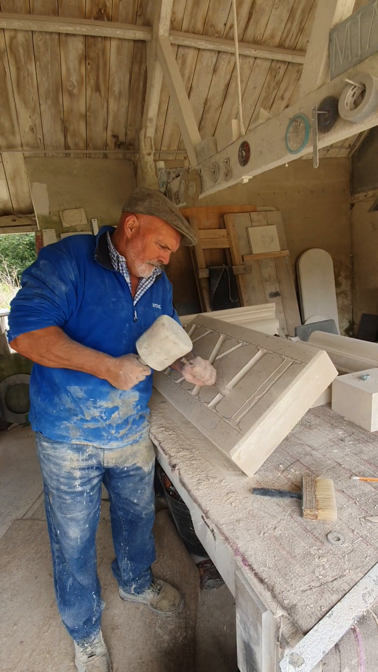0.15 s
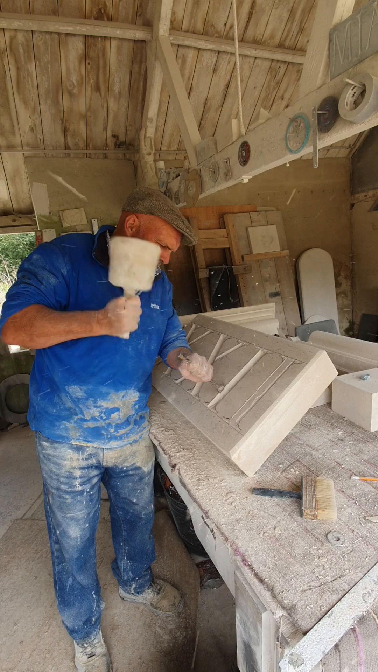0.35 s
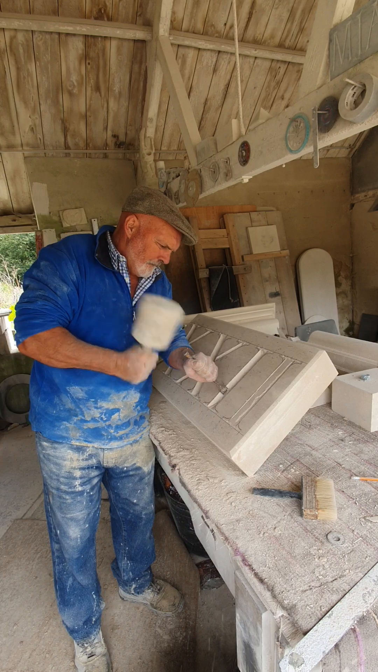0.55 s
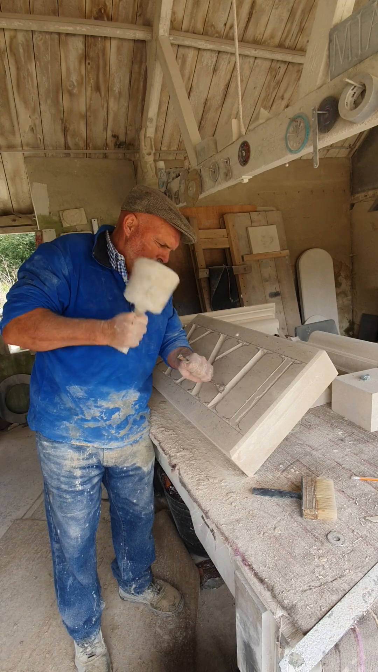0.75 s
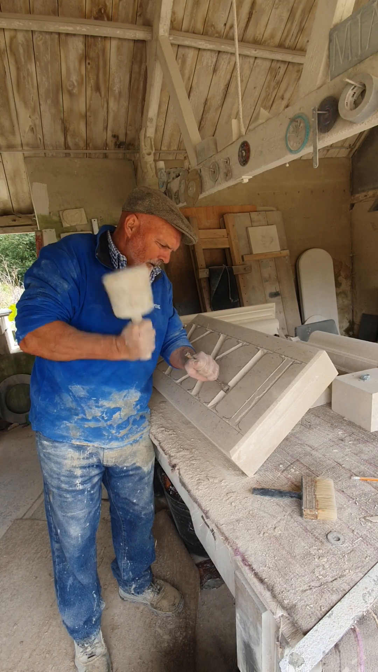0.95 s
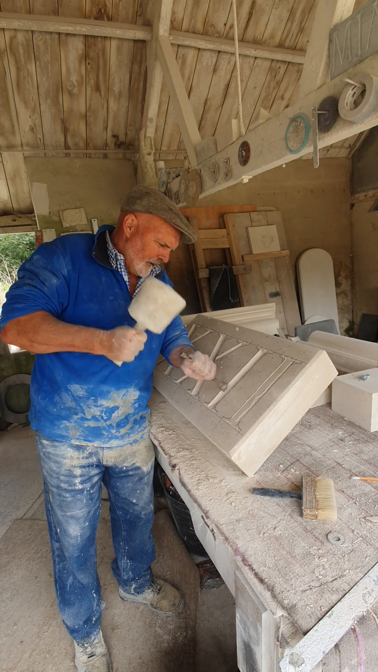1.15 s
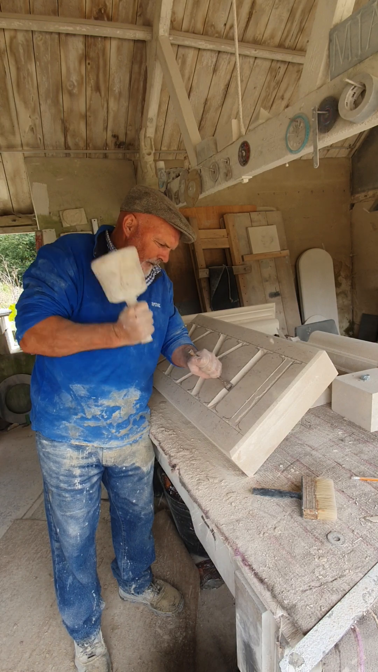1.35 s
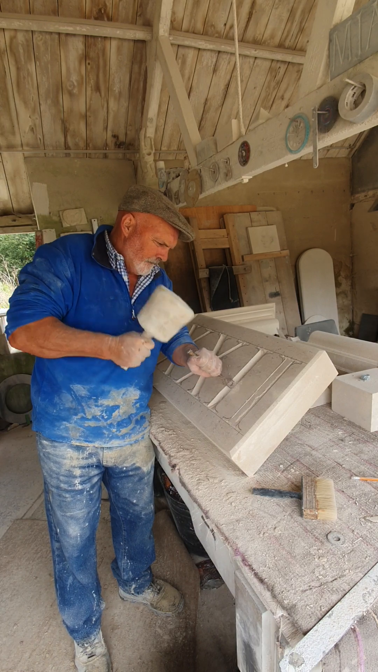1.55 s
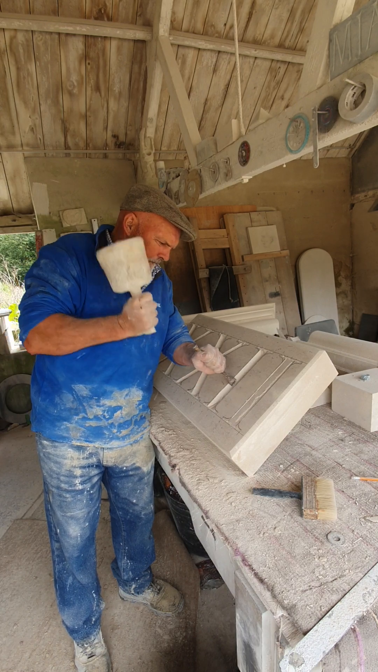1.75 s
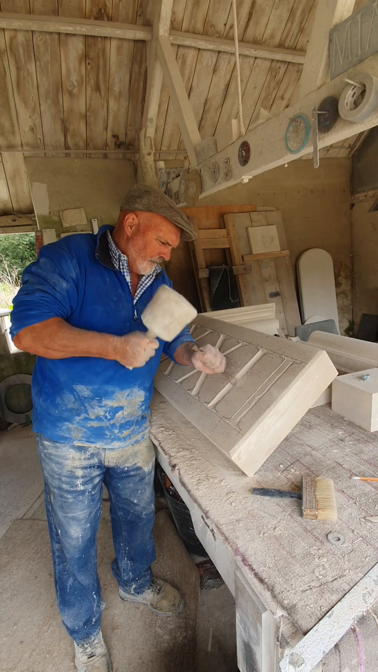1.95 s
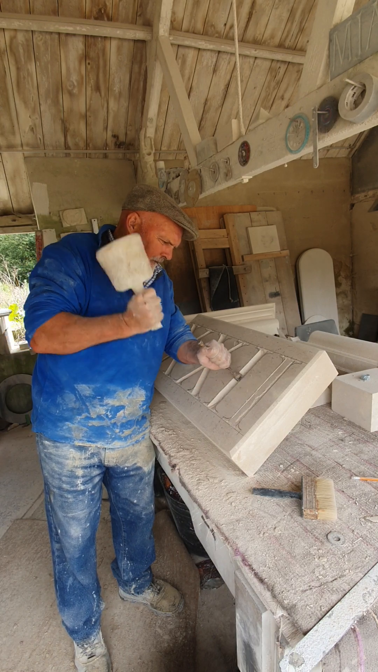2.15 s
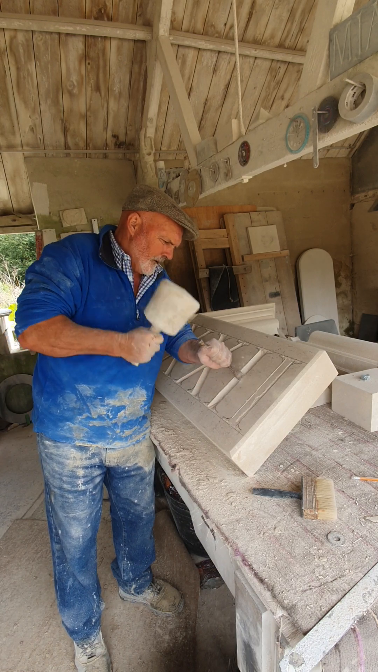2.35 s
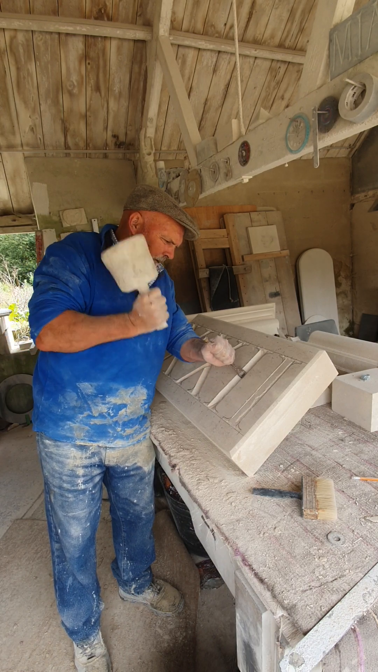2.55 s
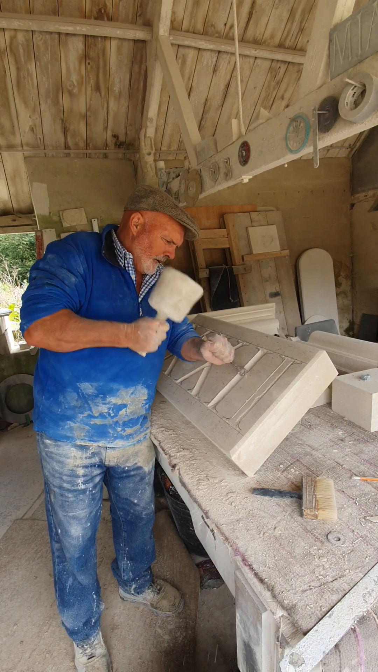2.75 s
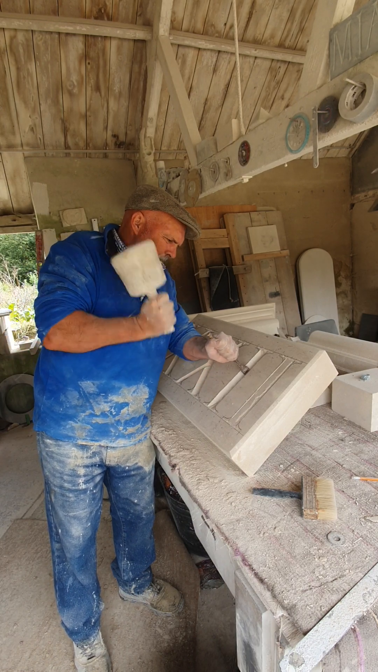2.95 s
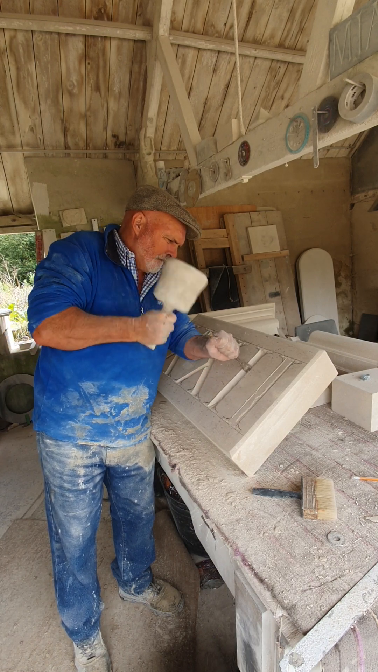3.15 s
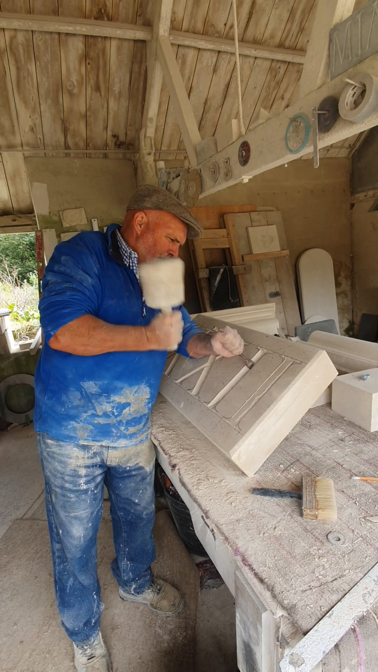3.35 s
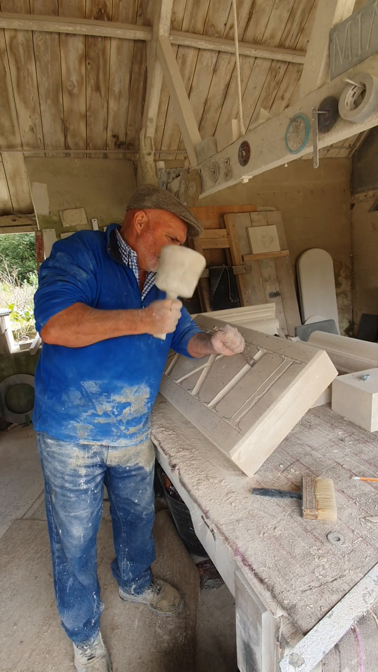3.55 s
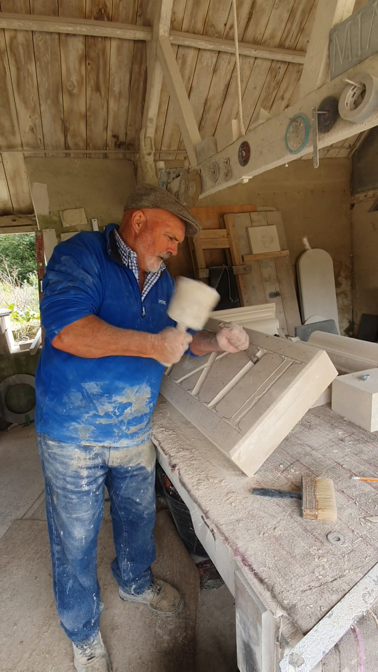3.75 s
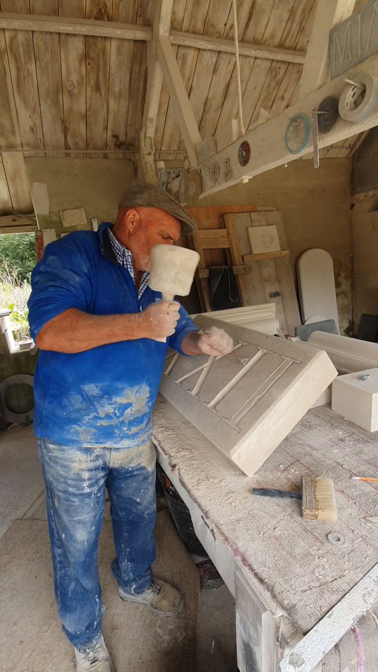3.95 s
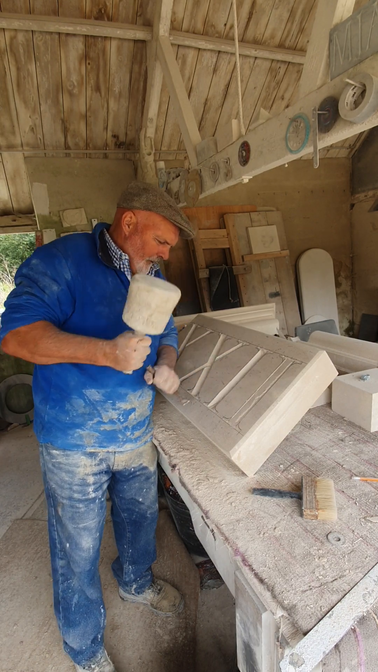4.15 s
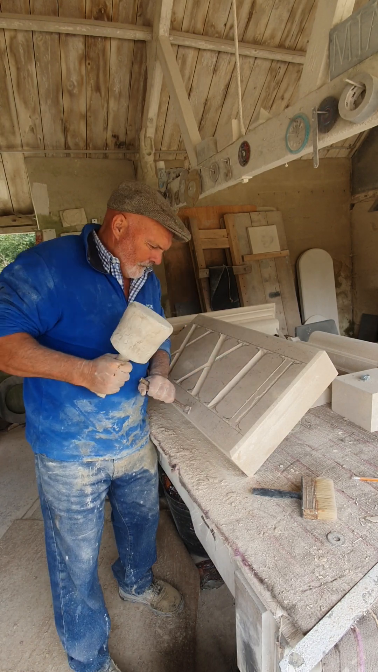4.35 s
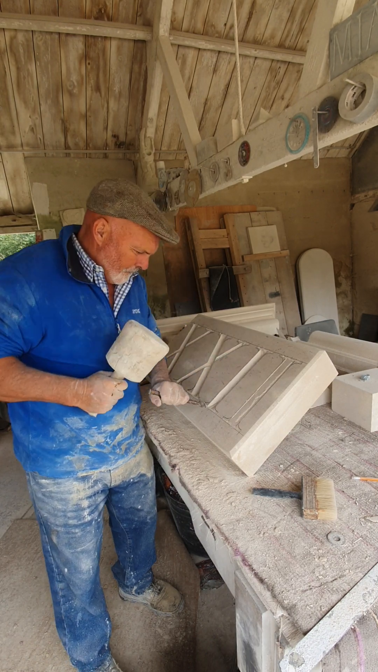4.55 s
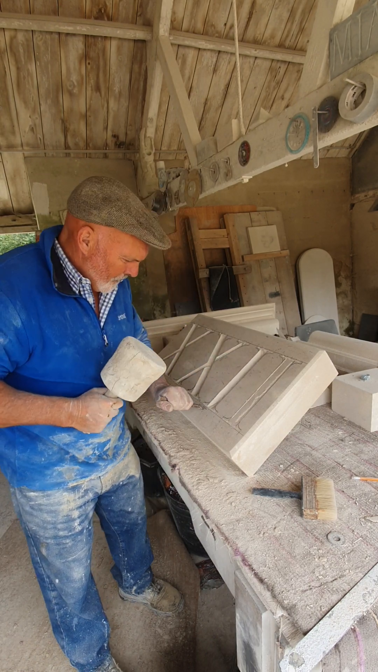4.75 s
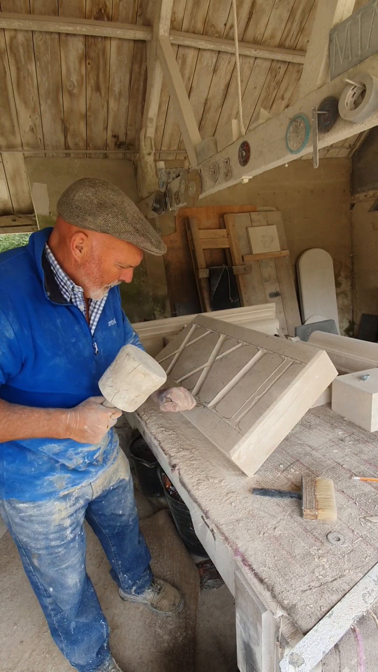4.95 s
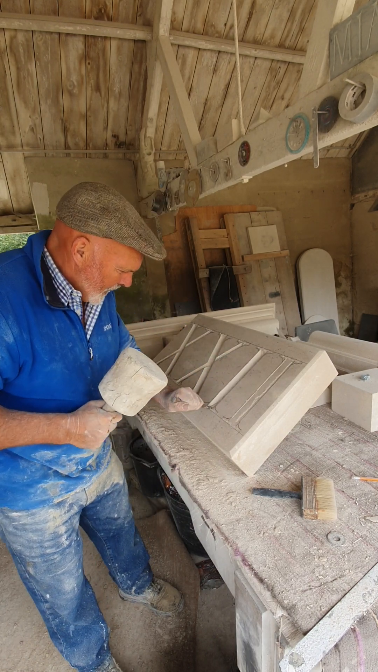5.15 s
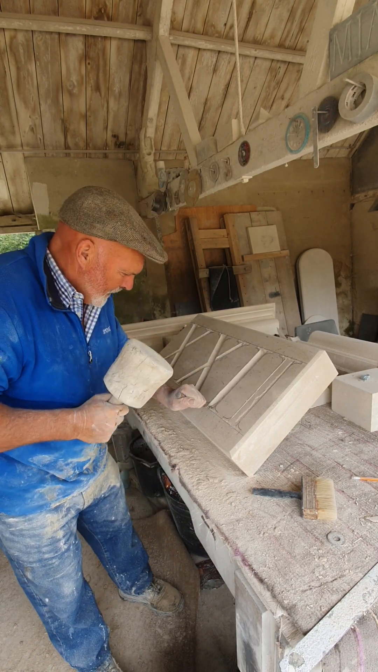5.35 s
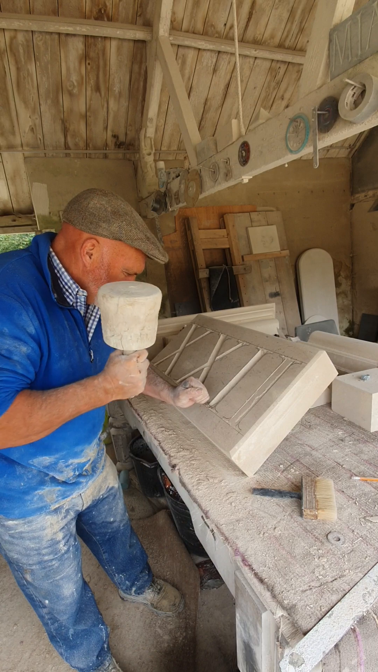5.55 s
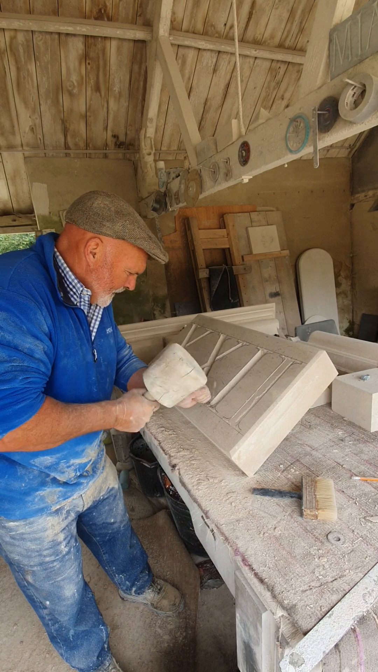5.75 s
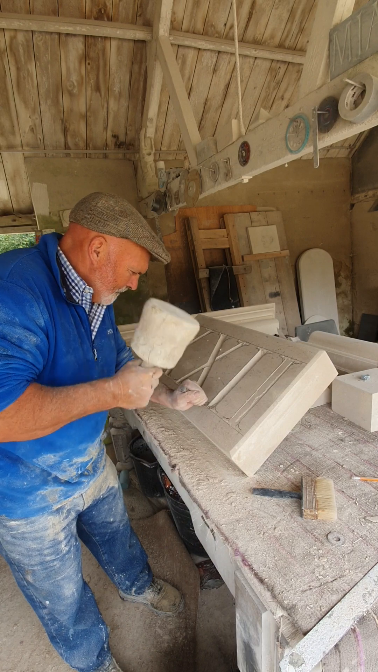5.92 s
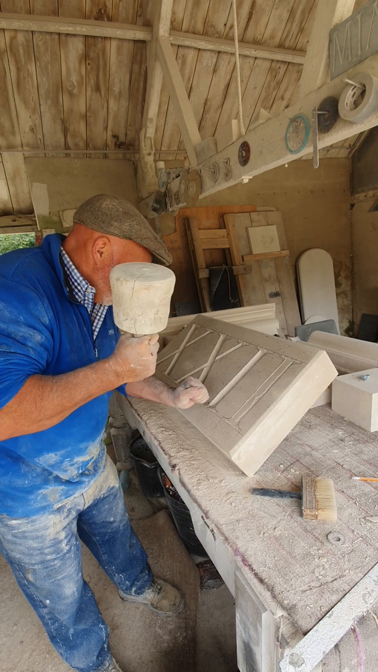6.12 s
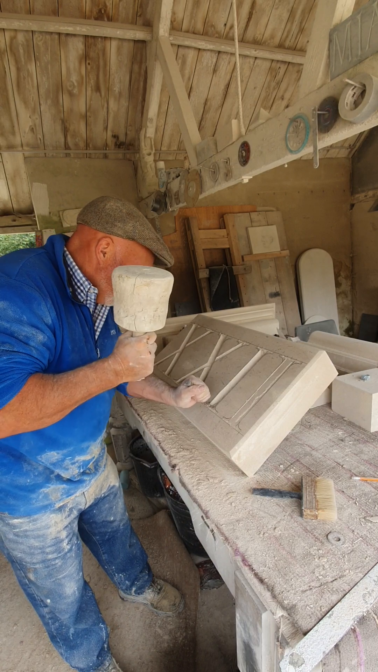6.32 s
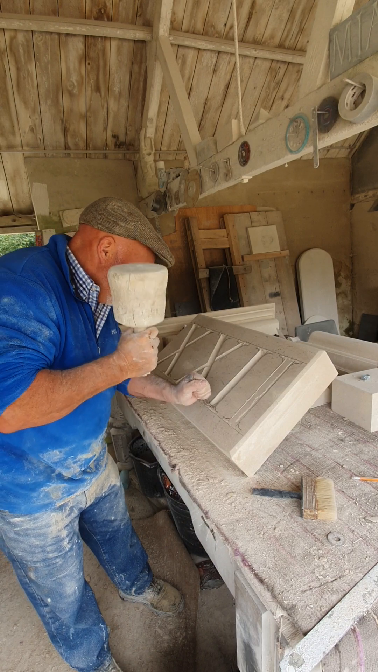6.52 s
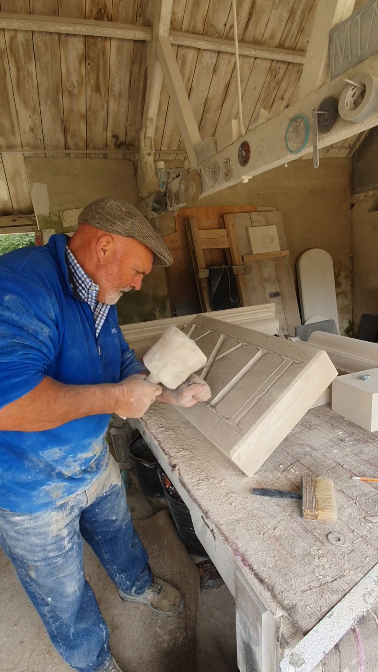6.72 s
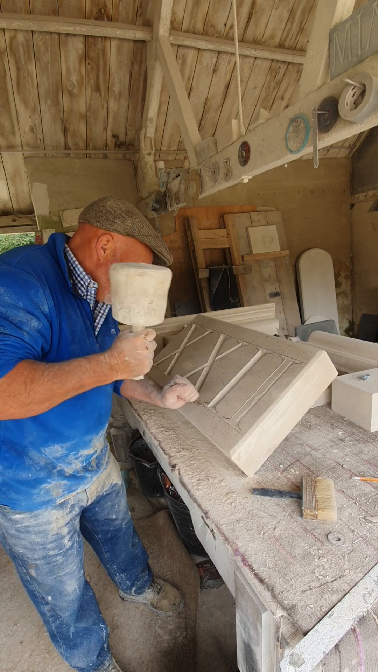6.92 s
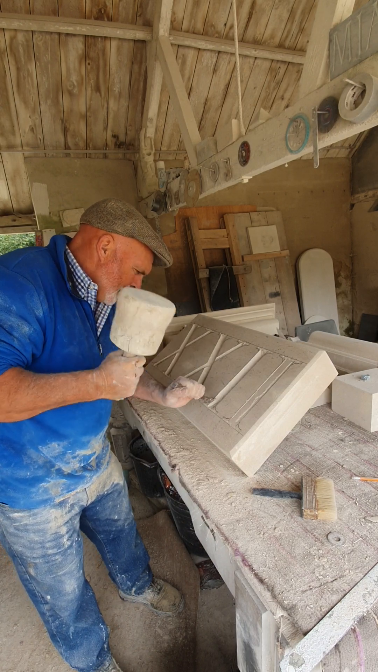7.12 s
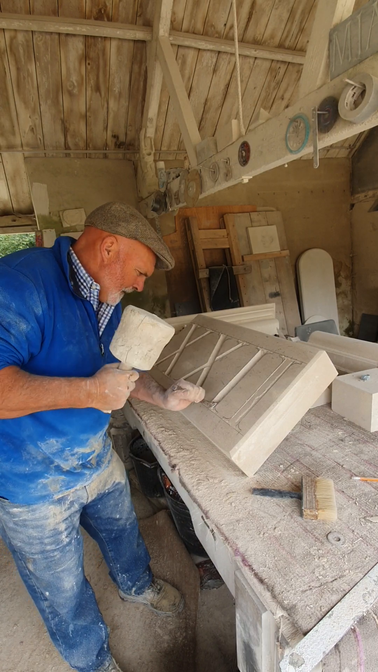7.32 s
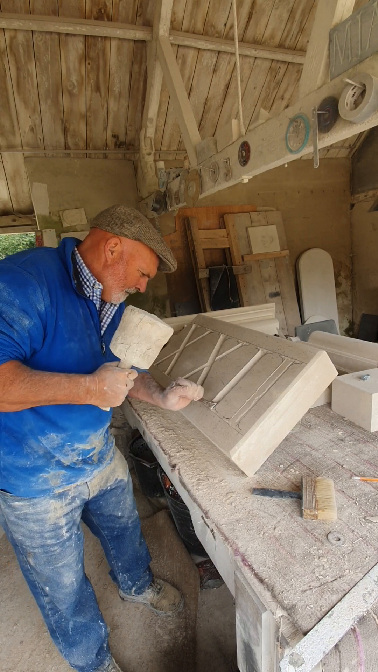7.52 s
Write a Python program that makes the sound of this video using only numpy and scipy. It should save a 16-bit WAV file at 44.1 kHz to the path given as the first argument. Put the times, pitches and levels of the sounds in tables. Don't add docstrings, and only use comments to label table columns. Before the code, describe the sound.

Steady stone carving heard from close by: eleven crisp, heavy chisel blows, slowly quickening, each booming through the bench and ringing briefly in slab and steel. Light clicks mark the edge being set back, and crumbs fall. Then the work stops, leaving low air buffeting, faint traffic and small birds, before one firm blow and, a second later, a weaker knock. Open wooden shed, stereo, little reverberation.

```python
import sys
import numpy as np
from scipy import signal
from scipy.fft import rfft, irfft
from scipy.io import wavfile
from scipy.ndimage import uniform_filter1d

SR = 44100
rng = np.random.default_rng(int(sys.argv[2]) if len(sys.argv) > 2 else 0)


def volts(x):
    e = np.asarray(x, float) / 20
    return 10 ** e


def digitize_waveform(pressure):
    field = np.atleast_2d(pressure).T
    bounded = np.clip(field, -1, 1)
    quanta = np.round(bounded * 32767).astype(np.int16)
    wavfile.write(sys.argv[1], SR, quanta)


N = 338688

# [t/s, bench level/dB, slab level/dB, shank level/dB]
BLOWS = [(-.215, -6.5, -6, -37), (0.2239, -9.5, -13, -38), (0.6734, -7.5, -10, -45.5),
         (1.1169, -8.5, -12, -37), (1.5537, -10.5, -23.5, -46), (1.9723, -10.5, -11, -39),
         (2.3688, -10, -17.5, -47), (2.754, -9, -17.5, -33), (3.136, -11, -15.5, -39.5),
         (3.5032, -12, -19.5, -37.5), (3.8658, -11.5, -13, -34.5), (5.82, -12, -18.5, -24),
         (6.764, -13.5, -14, -69.5)]
# [upper bench/dB, low slab/dB, upper slab pair/dB, slab edge/dB]
SEATS = [(-0.5, -2, 0.5, -2), (-3.5, -2.5, -1, -5), (-1, 0, -2, -3), (-1.5, -1, -2, 0), (-0.5, 2, 1, 3.5),
         (0, -0.5, -8, -0.5), (1, -0.5, -3.5, 2.5), (2, 2, -2.5, -1), (2.5, 1, -1.5, -1.5),
         (2, -1.5, 3, 3.5), (1.5, -2.5, 5, -3), (-2.5, 1, -2.5, 4.5), (-0.5, -3, -5, 0.5)]
# [t/s, crack/dB, knock/dB, splinter/dB, dust/dB]
BITES = [(-.22, 1.5, -4, -0.5, 0), (0.2208, 5.5, 3, -2.5, 2), (0.6707, 5.5, 1, 5, 3.5),
         (1.114, 0, -2.5, 5, 1.5), (1.5518, -1.5, 2, -2, -1), (1.9693, 4, -1, 5, 3),
         (2.3663, 3.5, 0, 0, -12), (2.7525, -2, 2.5, -5.5, -7), (3.1343, 1.5, 5.5, -2, 0.5),
         (3.5, -2.5, 5, 1, 2), (3.8632, 6.5, 3.5, -4, -5), (5.819, 1, -1.5, 2.5, 2),
         (6.762, -15, -4.5, -16.5, -7.5)]
# [t/s, f/Hz, width/Hz, level/dB]
BREAKS = [(.22, 6000, 595, 6.5), (.22, 11600, 700, 1), (.67, 4580, 605, 1.5), (.67, 1180, 300, -1),
          (1.11, 2830, 396, 0), (1.11, 1224, 149, 4.5), (1.55, 3930, 400.5, 2), (1.55, 2850, 403, 3),
          (1.97, 1740, 198, 3.5), (1.97, 3070, 403.6, -2.5), (2.37, 12100, 687, 10.5),
          (2.37, 1617, 300, -12), (2.75, 1214, 120, 6.5), (2.75, 3850, 350, 3), (2.75, 5600, 700, 3.5),
          (3.13, 3400, 352.4, 6), (3.13, 5400, 605, 2.5), (3.5, 3100, 345.7, 5.5), (3.5, 5946, 500, 4.5),
          (3.86, 1190, 151.5, 3.5), (3.86, 5400, 504, 4.5), (3.86, 2030, 252.2, -2), (5.82, 1030, 250, 5),
          (5.82, 6600, 600, 3.5), (5.82, 2605, 401.4, -2), (6.76, 2690, 441, 14), (6.76, 1350, 297, 1),
          (6.76, 3980, 400, 3)]
# [f/Hz, level/dB per Hz]
CRACK_SPECTRUM = [(290, -27), (500, -1), (833, -0.5), (1170, -3), (1450, -9.5), (1630, -9), (2600, -6),
                  (4530, -13.5), (5900, -13), (7150, -18.5), (7800, -29), (12800, -29.5), (16400, -42)]
# [f/Hz, level/dB, t60/s, direction]
SHANK_MODES = [(1855, 2, 0.15, 0.92), (1880, -1, 0.052, 0.5), (2750, -23, 0.18, -2),
               (2985, -22.5, 0.18, 1.44)]
# [f/Hz, level/dB, t60/s, direction]
SLAB_MODES = [(379, -3, .08, -1), (391.6, -19, .44, 1), (405.2, -16, .41, -1), (450.4, -8.5, .17, -1),
              (470.5, -11.5, .06, -1), (481.5, -3, .21, 1), (493.7, -16, .37, 1), (507, -19, .41, 1),
              (533.5, -2.5, .08, 1),
              (547.2, -10, 0.3, 0.99), (559.5, -14, 0.34, -1), (566, -17.5, 0.34, 1),
                  (594, -17, 0.16, 0.91), (611, -23.5, 0.38, -0.73), (641.8, -13, 0.19, 1),
                  (353, -19, .45, -1), (896, -24, 0.23, 0.9), (912, -26.5, 0.26, -1.1),
                  (994, -26, 0.15, 0.96), (1033, -25, 0.18, -1), (1113, -22, 0.18, 1),
                  (1190, -24.5, 0.31, 0.88), (1220, -25, 0.16, -1)]
# [f/Hz, level/dB, t60/s, direction]
BOARD_MODES = [(65.5, -3, .15, 1), (79, 2.5, .37, 1), (85.8, -22.5, .8, 1), (102.7, -14, .38, 1),
               (108.8, -17.5, .59, -1), (113.5, 2.5, .2, 1), (124.3, -15, .8, -1), (131, -2.5, .18, -1),
               (142.6, -11, .38, -1), (147.1, -10, .34, 1), (155.4, -14, .44, -1), (168.2, 0, .14, -1),
               (196.9, -9.5, .26, -1), (220.3, -11, .45, 1), (227.7, -.5, .17, 1), (235.5, -4.5, .3, 1),
               (253.8, -9, .34, 1), (261, -4, .23, 1), (279.9, .5, .08, 1), (315.6, -8, .29, -1),
               (326.7, -1.5, .2, -1)]
# [delay/s, level/dB, contact length/s, direction]
JOLTS = [
    (.0005, -8.5, 0.002, -0.89),
    (.0025, -4.5, 0.003, 0.82),
]
# [f/Hz, level/dB]
MOVED_BENCH = [(75, 0), (125, 4.5), (160, 4), (240, 0), (330, -1.5)]
# [f/Hz, phase/rad]
PORT_LEAD = [(70, -.2), (120, .06), (480, -.05), (570, .7), (700, .7), (1100, 1.9)]
# [t/s, level/dB, f/Hz, t60/s]
KNOCKS = [(5.8176, -4, 470, 0.014), (6.761, -15, 390, 0.012), (3.8635, -8, 1100, 0.011),
          (8.4, -33.5, 208, 0.042), (6.763, -36, 2700, 0.1), (4.69, -41.5, 130, .06), (3.8, -40, 170, .03)]
# [t/s, level/dB, f/Hz, slab level/dB]
SETS = [(0.026, -36.5, 1450, -51), (.472, -49.5, 2600, -47), (.486, -33.5, 2750, -66),
        (0.869, -36, 3420, -64), (.889, -49.5, 1000, -49.5), (0.917, -38, 1500, -45),
        (1.363, -38, 2032, -44), (1.401, -39.5, 1300, -56), (2.221, -30.5, 2637, -42.5),
        (2.591, -41, 2000, -43.5), (2.975, -44.5, 3900, -45), (3.369, -53.5, 3200, -48.5),
        (3.727, -44, 3040, -53), (4.781, -80, 4000, -74), (7.326, -57.5, 1900, -66.5)]
# [f/Hz, width/Hz, level/dB]
EDGE_RINGS = [(1600, 190, 7.5), (1820, 130, 1), (2750, 590, 4.5), (3778, 160, 2.5)]
# [f/Hz, level/dB, t60/s, direction]
TOUCH_MODES = [(478, -4, .25, 1), (492, -8, .25, -1), (552, -10, .35, -1), (1192, -16, .26, 1),
               (1212, -19, .22, -1), (2090, -27, .2, -1)]
# [t/s, level/dB, f/Hz, left port delay/s, left port level/dB]
BIG_CHIP = (1.8915, -24, 2750, .00043, -5)
# [t/s, level/dB, f/Hz]
CHIPS = [(0.016, -46, 5300), (.067, -51.5, 5800), (0.11, -51.5, 2700), (.413, -52.5, 6250),
         (.976, -58, 6000), (1.757, -60.5, 6595), (4.968, -67, 4400), (3, -45, 1300), (.137, -58, 2000)]
# [t/s, level/dB, top end re level/dB]
GRIT = [(0.032, -53, 3), (.137, -66, -11), (1.008, -66.5, -7), (1.401, -56.5, 4), (1.484, -66, -12.5),
        (3.8615, -39, -18.5), (4.193, -55, -27), (.497, -49.5, -6), (.533, -57.5, -1), (.573, -35.5, -10.5),
        (0.996, -57.5, 2), (1.417, -54.5, -1), (2.602, -48.5, -7), (3.755, -55.5, -6.5),
        (3.8362, -45.5, -2.5), (3.903, -46, 2), (4.36, -66, -25)]
# [t/s, level/dB, f/Hz, t60/s]
PINGS = [(.486, -38, 2700, .008), (1.755, -62, 6700, .04), (2.976, -58, 1200, .25), (4.785, -55, 500, .25),
         (5.925, -49, 4750, .07), (7.328, -70, 4000, .14), (7.328, -73, 3850, .12), (7.326, -59, 1540, .07),
         (7.33, -68, 2090, .12), (7.33, -64, 552, .3), (2.976, -56, 3950, .05)]
# [f/Hz, t60/s]
SHED_T60 = [(420, 0.12), (1100, 0.37), (2900, 0.22), (5000, 0.31), (7000, 0.43), (8500, 0.27),
            (15000, 0.22)]
# [f/Hz, level/dB]
SHED_TONE = [(450, -26), (650, -3.5), (900, -6.5), (1500, -4), (2600, -5), (3600, -4.5), (4800, -14.5),
             (6500, -17), (9000, -3.5), (15000, -7)]
# [f/Hz, correlation/1]
LIKENESS = [(60, 1), (180, .99), (550, .6), (1100, -.1), (1650, 0), (3000, .2), (5000, 0), (15000, -.15)]
# [delay/s, level over the wash/dB]
WALLS = [(.0115, 9.5), (.0135, 4.5), (.019, 4.5), (.025, 4.5), (.031, 1.5), (.039, 2.5)]
# [f/Hz, width/Hz, level/dB]
SHED_RINGS = [(1190, 120, -0.5), (1872, 130, -2), (2750, 220, 0.5), (5800, 600, -0.5)]
# [t/s, length/s, start f/Hz, end f/Hz, level/dB]
CHIRPS = [(0.954, 0.016, 3800, 4230, -80), (1.043, 0.028, 3280, 4200, -80), (2.654, 0.036, 5250, 5720, -78),
          (2.708, 0.033, 5000, 5660, -78), (3.032, 0.033, 3990, 4650, -77), (3.049, 0.028, 4790, 5700, -74),
          (3.1, 0.042, 5630, 5240, -82), (4.105, 0.027, 4950, 4700, -62), (4.122, 0.026, 6100, 5730, -77),
          (4.715, 0.028, 5456, 5300, -76), (4.833, 0.027, 6340, 5600, -73), (4.864, 0.023, 5600, 6500, -72),
          (4.083, 0.041, 5480, 6310, -60.5), (4.09, 0.027, 3960, 5200, -65),
          (4.207, 0.019, 4730, 4240, -64.5), (4.224, 0.021, 4330, 5450, -62),
          (4.222, 0.027, 5900, 6840, -65.5), (4.66, .02, 4780, 5030, -77.5),
          (4.659, 0.015, 6460, 6890, -70), (4.735, 0.037, 3900, 4970, -74),
          (4.746, 0.028, 5280, 6400, -67.5), (4.773, 0.078, 3920, 4520, -75),
          (4.849, 0.029, 4300, 5450, -64), (5.28, 0.03, 3900, 5170, -83), (5.306, 0.041, 5060, 5150, -82),
          (6.283, .05, 6720, 6670, -78), (5.718, .04, 4240, 4350, -73), (5.452, 0.022, 4220, 5460, -78),
          (5.712, 0.023, 4110, 6530, -66.5), (5.768, 0.054, 7020, 5000, -66),
          (5.786, 0.05, 4110, 4500, -63), (6.185, 0.03, 4500, 5870, -66), (6.187, 0.027, 3810, 4230, -79),
          (6.313, 0.035, 3920, 6300, -64.5), (6.554, 0.04, 3725, 5230, -73),
          (6.558, 0.027, 2710, 4120, -78), (6.71, 0.026, 3930, 5020, -71), (6.718, 0.021, 2900, 3960, -80)]
# [t/s, level/dB]
AIR = [(0, -63.5), (.4, -52.5), (1.3, -54.5), (1.95, -56), (2.3, -54), (2.65, -33), (3.0, -41), (3.53, -55),
       (3.89, -32.5), (4.1, -34.5), (4.5, -49), (5.37, -57.5), (5.97, -45), (6.63, -47.5), (6.84, -38.5),
       (7.05, -50.5), (7.68, -64)]
# [t/s, peak level/dB]
PUFFS = [(2.222, -29.5), (2.465, -26), (2.978, -37), (4.069, -17), (4.169, -36), (4.248, -35.5),
         (4.351, -32), (4.448, -49), (4.601, -42.5), (4.691, -33), (4.981, -35.5), (5.249, -41),
         (5.349, -50), (5.54, -47), (5.68, -39), (5.931, -20.5), (6.081, -29.5), (6.294, -32.5),
         (6.47, -31), (6.639, -32), (6.721, -24.5), (7.169, -39.5), (7.282, -23), (7.519, -51)]
# [t/s, peak level/dB]
FLICKS = [(4.19, -25.5), (7.286, -33)]
# [f/Hz, level/dB per Hz]
RUMBLE = [(53, -34.5), (90, -11), (173, -4.5), (225, -12.5), (311, -11.5), (561, -27), (653, -32.5),
          (987, -41), (5400, -44.5), (6420, -38), (7640, -49.5), (15000, -49.5), (16400, -62)]
# [t/s, level/dB]
TRAFFIC = [(0, -52.5), (.4, -57.5), (2.0, -59.5), (3.5, -59.5), (4.05, -45), (4.5, -68.5), (4.85, -67.5),
           (5.4, -60), (6.1, -57.5), (6.6, -66.5), (7.0, -62), (7.68, -68.5)]
# [t/s, level/dB]
DUST = [(0, -72.5), (1, -76), (2, -73.5), (3, -70.5), (4.2, -72.5), (4.45, -92.5), (7.68, -91)]

KNOCK_HZ, CRACK_HZ, SPLINTER_HZ, DUST_HZ = 1000, 2700, 5800, 11000
UPPER_BENCH_HZ, LOW_SLAB_HZ, MAIN_PAIR_HZ, UPPER_PAIR_HZ, EDGE_HZ = 190, 410, 480, 550, 650
EVEN = .8
CRACK_UNLIKE = 0.61
BOUNCE, BOUNCE_S = 0.2, 0.00026
BENCH_ECHO_S, BENCH_ECHO_DB = .0038, -10
SPALLS, SPALL_DB, SPALL_FALL_S = 14, -16, .06
GRIP_S, GRIP_DB_PER_S = .065, 500
ROCK_S, ROCK_DB_PER_S, SETTLE_DB, SETTLE_S = .078, 69, 4, 0.0044
MOVE_S, MOVED_LATE_S = 5, .004
SET_OCTAVES, SET_TOP_DB = 1.8, -32
CHIP_OCTAVES, CHIP_TOP_DB, CHIP_RING_DB = 0.99, -30.5, -17.5
GRIT_HZ, GRIT_OCTAVES, GRIT_RING_DB = 4500, 1.9, -17.5
TICK_DECAY_S = .001
LATE_DB, LATE_T60_S = -15.5, 0.56
WALL_S, PATCHY_DB = 0.00023, 3.5
PUFF_HZ, FLICK_HZ = 61.2, 137
MIC_TOP_HZ = 15800
SNAP_LEAD_S = 100 / SR


def cracks():
    out = np.zeros((2, N))
    for s, crack_db, knock_db, splinter_db, dust_db in BITES:
        tint = [(KNOCK_HZ, knock_db), (CRACK_HZ, crack_db), (SPLINTER_HZ, splinter_db), (DUST_HZ, dust_db)]
        bite = np.zeros((2, N // 12))
        alike = snap(decay_s=.003, grain_db=3.5, even=EVEN)
        apart = snap(decay_s=.004, grain_db=3.0, even=EVEN)
        apart = CRACK_UNLIKE * apart - BOUNCE * np.roll(alike, round(BOUNCE_S * SR))
        add(bite, 0, volts(12.5) * colour(alike + apart * [[1], [-1]], tint))
        add(bite, BENCH_ECHO_S, volts(BENCH_ECHO_DB) * bite[::-1, :1024].copy())
        spalls(bite, SNAP_LEAD_S, tint)
        piece = [row[1:] for row in BREAKS if abs(row[0] - s) < .1]
        add(out, s - SNAP_LEAD_S - .0003, resonate(bite, piece))
    return colour(out, CRACK_SPECTRUM)


def spalls(track, s, tint):
    for delay, size in rng.exponential(1, (SPALLS, 2)):
        db = SPALL_DB - 14 * delay + 3.5 * min(size, 1.5)
        crumb = colour(snap(decay_s=0.00066, grain_db=0.0), tint)
        add(track, s + .006 + SPALL_FALL_S * delay, volts(db) * crumb)


def shank_rings():
    out = np.zeros((2, N))
    t = np.arange(14000) / SR
    grip_db = GRIP_DB_PER_S * np.maximum(t - GRIP_S, 0)
    for s, _, _, db in BLOWS:
        ring = modes(SHANK_MODES, spread_db=0.7, swell_s=0.014, turn=0.56, length=len(t))
        add(out, s, volts(db + 3.5 - grip_db) * ring)
    return out


def slab_rings():
    out = np.zeros((2, N))
    for (s, _, slab_db, _), (_, low_db, pair_db, edge_db) in zip(BLOWS, SEATS):
        seat = [(LOW_SLAB_HZ, low_db), (MAIN_PAIR_HZ, 0), (UPPER_PAIR_HZ, pair_db),
                (EDGE_HZ, edge_db), (KNOCK_HZ, 0)]
        stone = [(hz, db + at_hz(seat, hz), t60, way) for hz, db, t60, way in SLAB_MODES]
        turn = np.minimum(.3 * (np.array(stone)[:, :1] / UPPER_PAIR_HZ) ** 2, .5)
        ring = modes(stone, spread_db=2.5, swell_s=.0058, turn=turn, lead=1, length=18000)
        add(out, s, volts(slab_db + 4.0) * rocking(length=18000) * ring)
    return out


def rocking(length):
    t = np.arange(length) / SR
    free_db = ROCK_DB_PER_S * np.minimum(t, ROCK_S)
    return volts(free_db - SETTLE_DB * np.clip((t - ROCK_S) / SETTLE_S, 0, 1))


def bench_booms():
    out = np.zeros((2, N))
    for (s, bench_db, _, _), (upper_db, _, _, _) in zip(BLOWS, SEATS):
        moved = s > MOVE_S
        boards = [(hz, db + moved * at_hz(MOVED_BENCH, hz) + (hz > UPPER_BENCH_HZ) * upper_db, t60, way)
                  for hz, db, t60, way in BOARD_MODES]
        boom = modes(boards, spread_db=1.5, swell_s=.0066, turn=.17, lead=1)
        add(out, s + moved * MOVED_LATE_S, volts(bench_db - 6.0) * boom)
        add(out, s - .0025, volts(bench_db + 39.0) * jolts(rng.uniform(0.94, 1.05)))
    for s, db, hz, t60 in KNOCKS:
        knock = modes([(hz, db, t60, 1)], spread_db=-0.5, swell_s=0.000077, turn=0.061, length=2000)
        add(out, s, knock)
    return band(band(out, 50, 9000), 53, 9000)


def jolts(stretch):
    out = np.zeros(2600)
    for delay, db, contact, direction in JOLTS:
        push = np.hanning(int(contact * stretch * SR) + 2)
        add(out, delay * stretch, direction * volts(db) * push / push.sum())
    return out


def ticks():
    out = big_chip()
    for s, db, hz, slab_db in SETS:
        tick(out, s, db - 6.0, hz, SET_OCTAVES, SET_TOP_DB, slab_db, EDGE_RINGS)
    for s, db, hz in CHIPS:
        tick(out, s, db, hz, CHIP_OCTAVES, CHIP_TOP_DB, db + CHIP_RING_DB)
    for s, db, top_db in GRIT:
        tick(out, s, db, GRIT_HZ, GRIT_OCTAVES, top_db, min(db, -50) + GRIT_RING_DB)
    for s, db, hz, t60 in PINGS:
        add(out, s, modes([(hz, db, t60, 1)], spread_db=-2.5, swell_s=0.0011, turn=0.38, length=9000))
    return out


def big_chip():
    s, db, hz, late_s, left_db = BIG_CHIP
    out = np.zeros((2, N))
    tick(out, s, db, hz, 1.74, -42.5, -66.0, [(hz, 350, 9)])
    return np.array([volts(left_db) * np.roll(out[1], round(late_s * SR)), out[1]])


def tick(out, s, db, hz, octaves, top_db, slab_db, rings=()):
    click = snap(decay_s=TICK_DECAY_S, grain_db=-1.0)
    spread = 2 ** (octaves / 2)
    pitched = band(band(click, hz / spread, hz * spread), hz / spread, hz * spread)
    bright = volts(top_db) * band(click, 9500, 16000)
    add(out, s - SNAP_LEAD_S, volts(db + 20) * (resonate(pitched, rings) + bright))
    touch = modes(TOUCH_MODES, spread_db=2.0, swell_s=0.0016, turn=0.28, length=12000)
    add(out, s, volts(slab_db) * touch)


def shed(x, build_up_s):
    t = np.arange(26000) / SR
    edges = 320 * 2 ** np.arange(0, 6.5, .5)
    echo = 0
    answers = volts(sum(db * np.exp(-((t - s) / WALL_S) ** 2) for s, db in WALLS))
    for low, high in zip(edges, edges[1:]):
        mid, side = band(rng.standard_normal((2, len(t))), low, high)
        hz = np.sqrt(low * high)
        alike = np.clip(at_hz(LIKENESS, hz), -1, 1)
        wash = np.sqrt(1 + alike) * mid + np.sqrt(1 - alike) * side * [[1], [-1]]
        late = volts(LATE_DB - 60 * t / LATE_T60_S) * (hz < 7500)
        dying = volts(-60 * t / at_hz(SHED_T60, hz)) + late
        dying = volts(at_hz(SHED_TONE, hz)) * dying * (1 - np.exp(-t / build_up_s))
        patches = np.repeat(rng.standard_normal(len(t) // 200 + 1), 200)[:len(t)]
        patchy = volts(PATCHY_DB * 1.23 * uniform_filter1d(patches, size=200))
        echo = echo + answers * patchy * dying * wash
    return signal.fftconvolve(resonate(x, SHED_RINGS)[None], echo)[:, :N]


def birds():
    out = np.zeros(N)
    for s, length, from_hz, to_hz, db in CHIRPS:
        u = np.linspace(0, 1, int(length * SR))
        hz = from_hz + (to_hz - from_hz) * (1 - np.cos(np.pi * u)) / 2
        hz = hz + 120 * np.sin(2 * np.pi * 65 * u * length + rng.uniform(0, 6.6))
        whistle = np.sin(2 * np.pi * np.cumsum(hz) / SR)
        add(out, s, volts(db) * np.sin(np.pi * u) ** 0.51 * whistle)
    t = np.arange(13000) / SR
    smear = rng.standard_normal((2, len(t))) * volts(-25.5 - 60 * t / .38)
    return out * volts([[-.8], [.8]]) + signal.fftconvolve(out[None], smear)[:, :N]


def air():
    lumps = volts(1.3 * rms_one(band(rng.standard_normal((2, N)), 2.5, 5.2)))
    out = volts(in_time(AIR)) * rms_one(band(rng.standard_normal((2, N)), 37, 97) * lumps)
    puffs = [(*row, PUFF_HZ) for row in PUFFS] + [(*row, FLICK_HZ) for row in FLICKS]
    for s, db, hz in puffs:
        u = np.linspace(0, 1, int(2.2 * SR / hz))
        shift = rng.normal(0, 1.0, (2, 1))
        add(out, s - .01, volts(db) * np.sin(np.pi * u) ** 2 * np.sin(2 * np.pi * 2.53 * u + shift))
    return out


def dust():
    grains = rng.standard_normal((2, N)) * volts(2.5 * rng.exponential(1, (2, N)))
    return volts(in_time(DUST)) * rms_one(band(band(grains, 1000, 7000), 900, 8000))


def rumble_and_hiss():
    mid, side = colour(rng.standard_normal((2, N)), RUMBLE)
    low_pass = signal.butter(2, 750, fs=SR, output="sos")
    low = rms_one(signal.sosfilt(low_pass, [mid + 0.18 * side, mid - .55 * side]))
    hiss = rms_one(band(colour(rng.standard_normal((2, N)), RUMBLE), 370, 17000))
    hiss = colour(hiss, [(5500, 1.0), (6900, -2.0), (7300, -3.5)])
    return volts(in_time(TRAFFIC) + 7.5) * low + volts(-70) * hiss


def modes(table, spread_db, swell_s, turn, lead=0, length=26000):
    t = np.arange(length) / SR
    hz, db, t60, direction = np.transpose(table)[:, :, None]
    strength, side, shift = rng.standard_normal((3, len(table), 1))
    side = .4 * side + 1.3 * np.cos(2.4 * np.arange(len(table)))[:, None]
    hz = hz * (1 + .003 * shift)
    ring = direction * volts(db + spread_db * strength - 60 * t / t60)
    swell = (1 - np.exp(-t / swell_s)) ** 2
    phase = turn * side + lead * at_hz(PORT_LEAD, hz) / 2
    return np.array([swell * np.sum(ring * np.sin(2 * np.pi * hz * t + way * phase), axis=0)
                     for way in (1, -1)])


def snap(decay_s, grain_db, even=0.36):
    t = np.arange(-100, 924) / SR
    grains = rng.standard_normal(len(t)) * volts(grain_db * rng.exponential(1, len(t)))
    shape = (t > 0) * (1 - np.exp(-t / 0.00012)) * np.exp(-t / decay_s)
    lines = rfft(grains * shape)
    burst = irfft(lines / (np.abs(lines) + 1e-9) ** even) * (t > 0)
    return burst / np.sqrt(np.sum(burst ** 2))


def resonate(x, table):
    out = x
    for hz, width_hz, db in table:
        r = np.exp(-np.pi * width_hz / SR)
        feed = [(1 - r * r) / 2, 0, (r * r - 1) / 2]
        back = [1, -2 * r * np.cos(2 * np.pi * hz / SR), r * r]
        out = out + volts(db) * signal.lfilter(feed, back, x)
    return out


def at_hz(points, hz):
    points_hz, values = np.transpose(points)
    return np.interp(np.log(hz + 1), np.log(points_hz), values)


def in_time(points):
    return np.interp(np.arange(N) / SR, *np.transpose(points))


def rms_one(x):
    return x / np.sqrt(np.mean(x ** 2) + 1e-30)


def colour(x, points):
    hz = np.fft.rfftfreq(x.shape[-1], 1 / SR)
    return irfft(rfft(x) * volts(at_hz(points, hz)), x.shape[-1])


def band(x, low_hz, high_hz):
    sos = signal.butter(2, [low_hz, min(high_hz, .45 * SR)], "band", fs=SR, output="sos")
    return signal.sosfilt(sos, x)


def add(track, s, sound):
    i = round(s * SR)
    sound, i = sound[..., max(-i, 0):], max(i, 0)
    track[..., i:i + sound.shape[-1]] += sound[..., :N - i]


def scene():
    crack, shank, slab, bench = cracks(), shank_rings(), slab_rings(), bench_booms()
    chips = ticks()
    edge = crack + shank + chips
    left = (np.roll(edge[0], 2) + bench[0]) * volts(3.5) + slab[0] * volts(-1.25)
    right = edge[1] * volts(6.0) + bench[1] * volts(4.0) + slab[1] * volts(1.17)
    send = crack[1] + volts(-1.0) * chips[1] + volts(-6.0) * band(slab[0], 300, 690) + volts(-16) * shank[0]
    echo = shed(send, build_up_s=0.005)
    return np.array([left, right]) + volts(-30.0) * echo + birds() + air() + dust() + rumble_and_hiss()


def roll_off(x):
    return signal.sosfilt(signal.butter(12, 16530, fs=SR, output="sos"), x)


def record(dry):
    rounded = 1.038 * np.tanh(dry / 1.234)
    top_cut = signal.cheby2(10, 45, MIC_TOP_HZ + 500, fs=SR, output="sos")
    mix = signal.sosfilt(top_cut, rounded)
    return roll_off(mix)


dry = scene()
out = record(dry)
digitize_waveform(out)
```